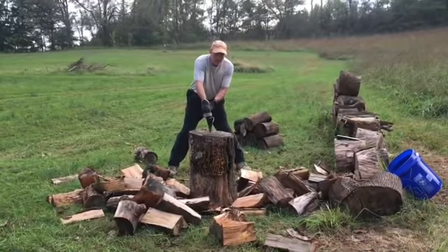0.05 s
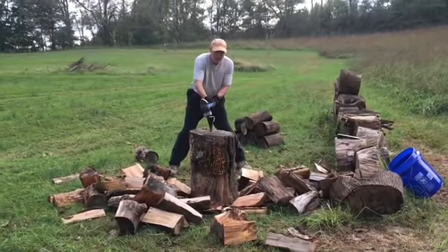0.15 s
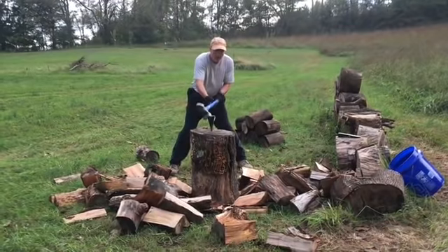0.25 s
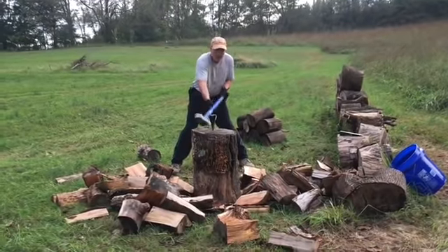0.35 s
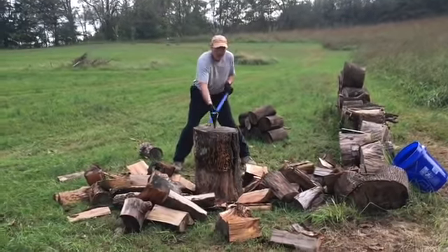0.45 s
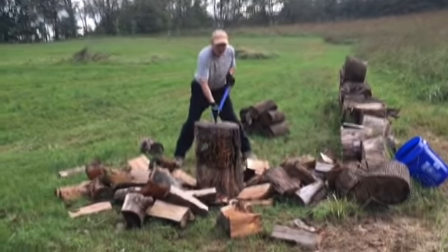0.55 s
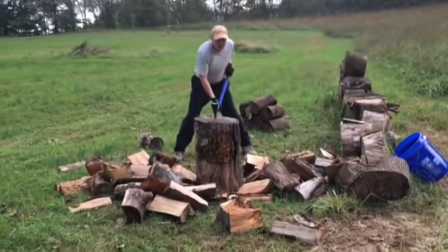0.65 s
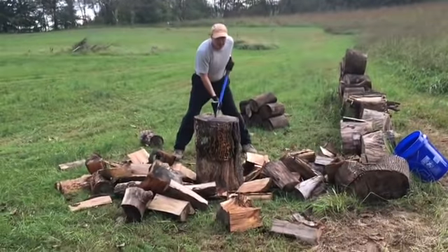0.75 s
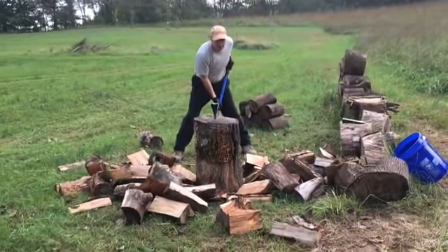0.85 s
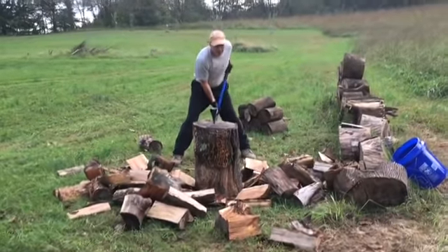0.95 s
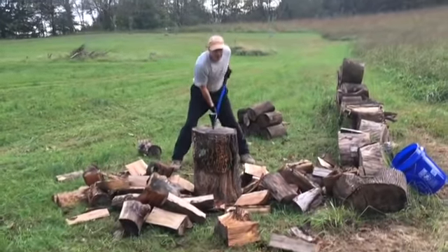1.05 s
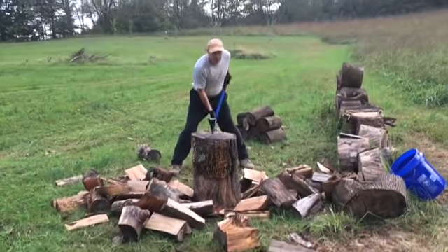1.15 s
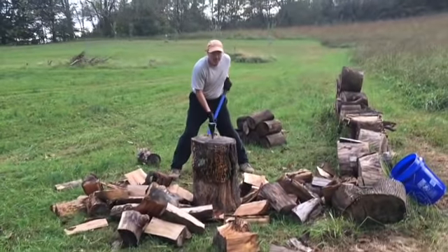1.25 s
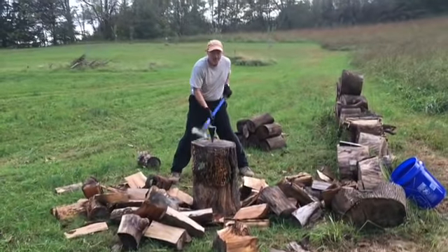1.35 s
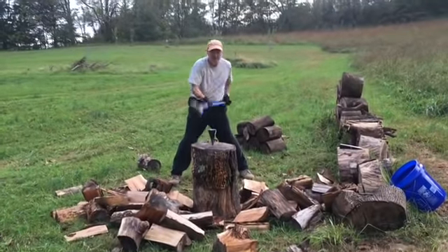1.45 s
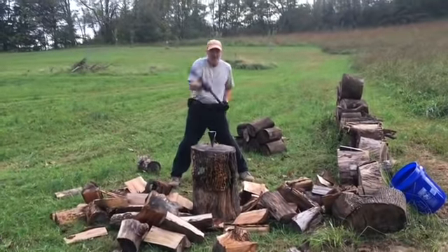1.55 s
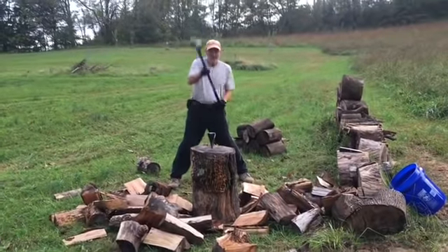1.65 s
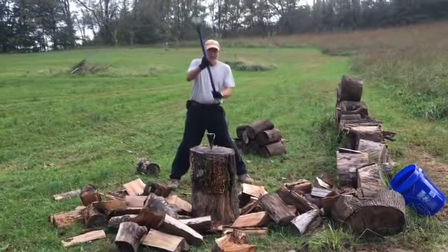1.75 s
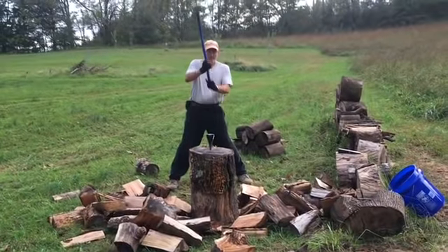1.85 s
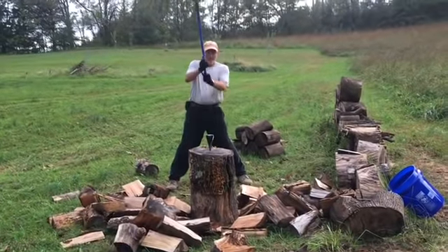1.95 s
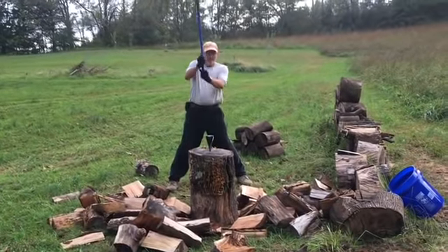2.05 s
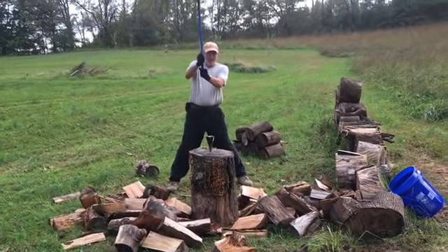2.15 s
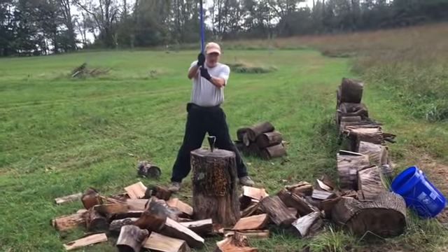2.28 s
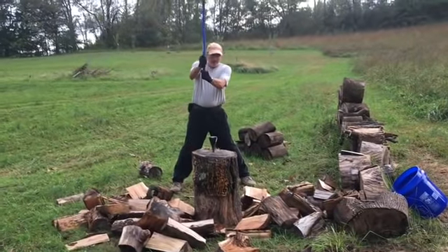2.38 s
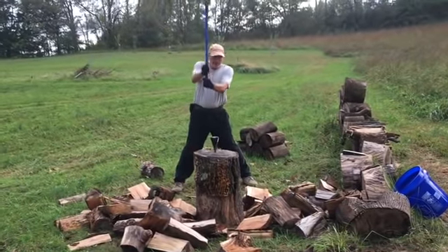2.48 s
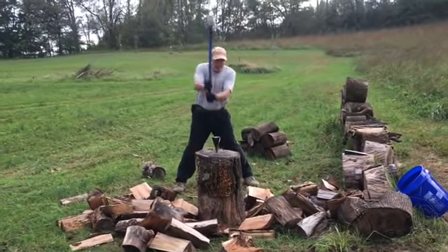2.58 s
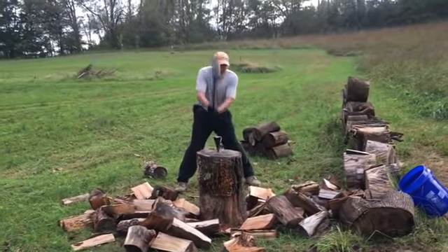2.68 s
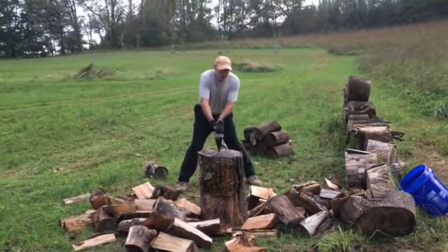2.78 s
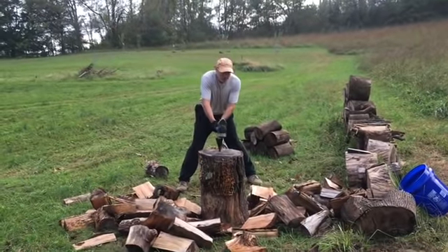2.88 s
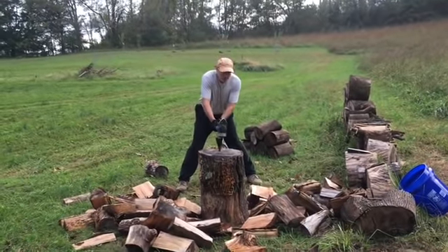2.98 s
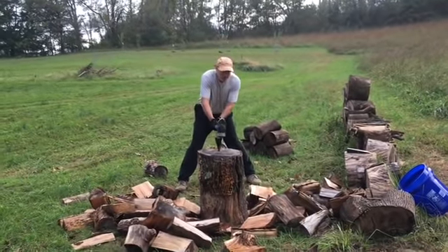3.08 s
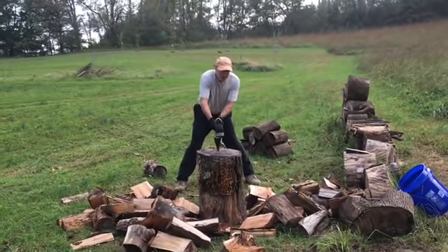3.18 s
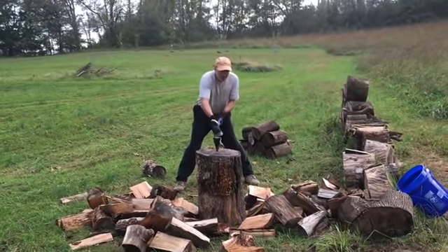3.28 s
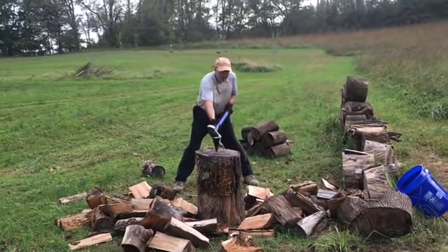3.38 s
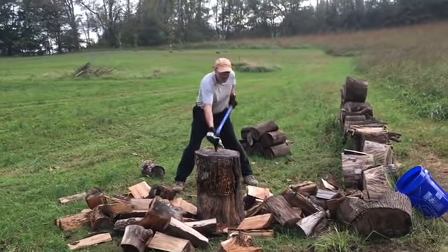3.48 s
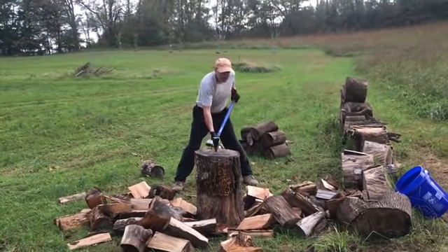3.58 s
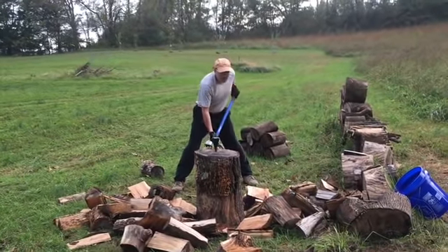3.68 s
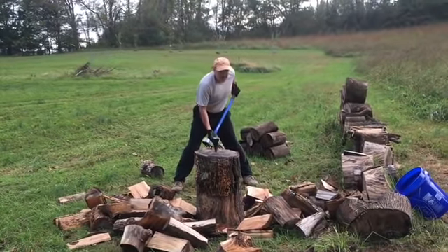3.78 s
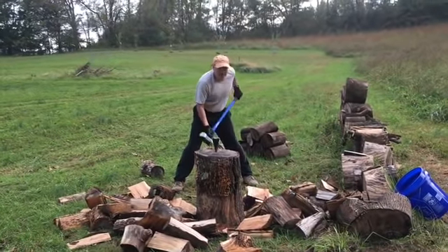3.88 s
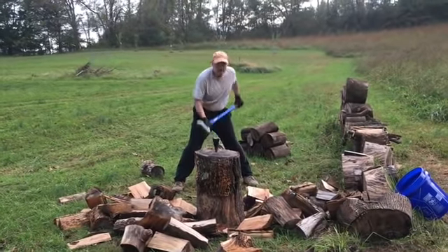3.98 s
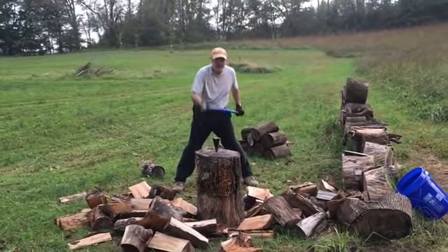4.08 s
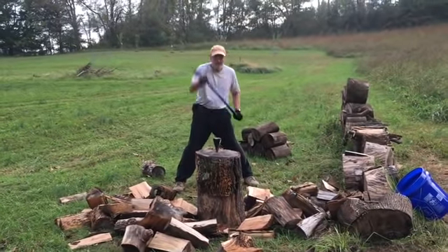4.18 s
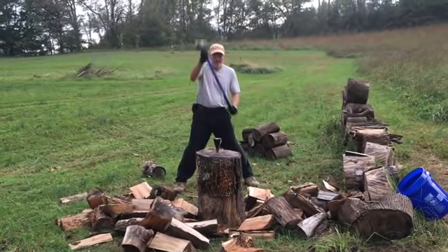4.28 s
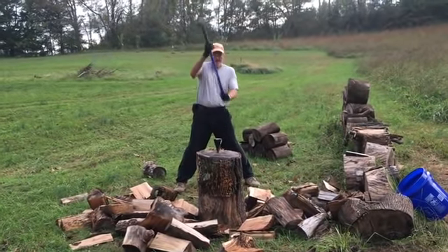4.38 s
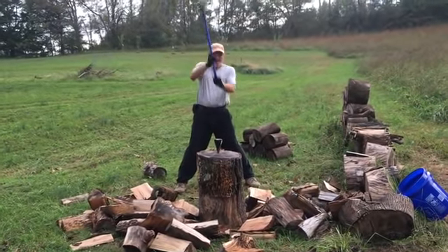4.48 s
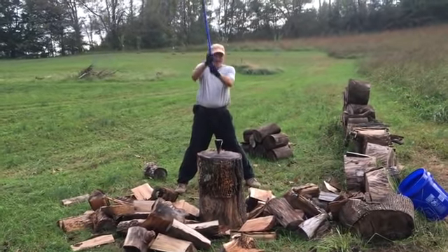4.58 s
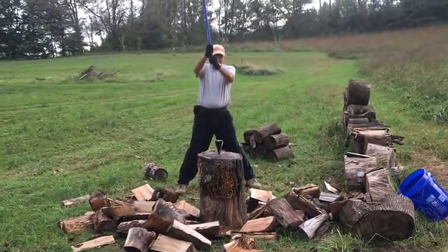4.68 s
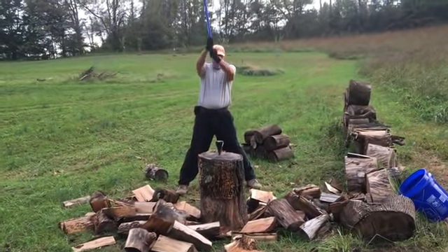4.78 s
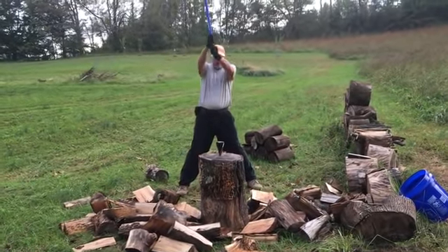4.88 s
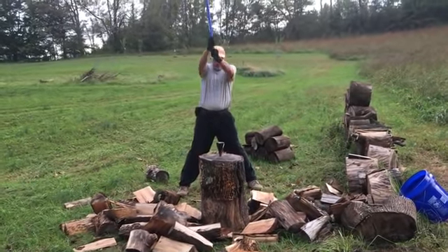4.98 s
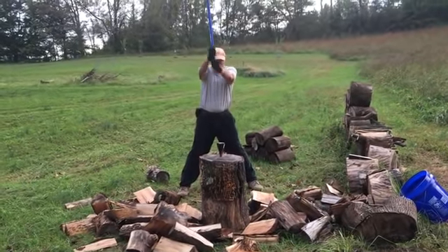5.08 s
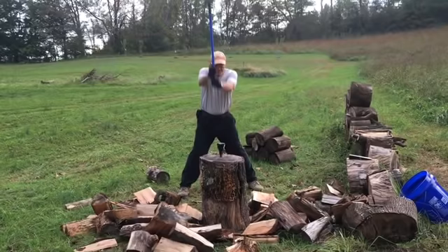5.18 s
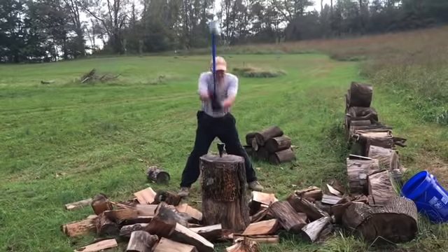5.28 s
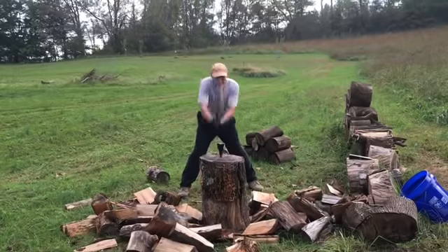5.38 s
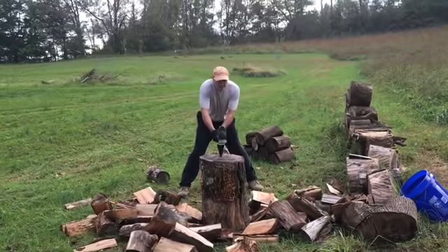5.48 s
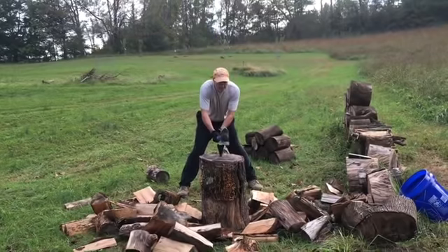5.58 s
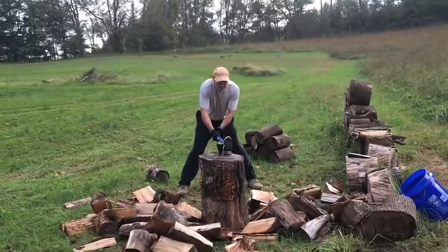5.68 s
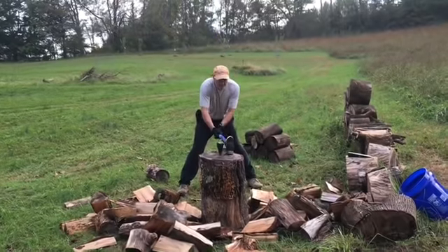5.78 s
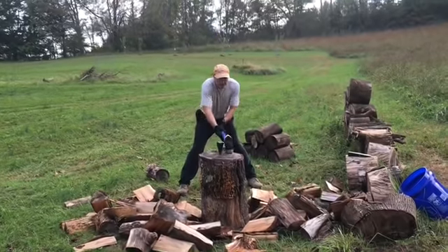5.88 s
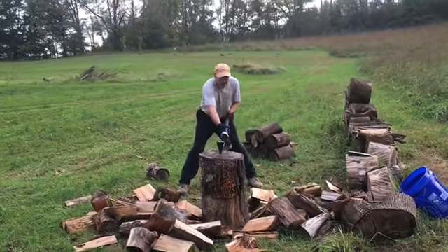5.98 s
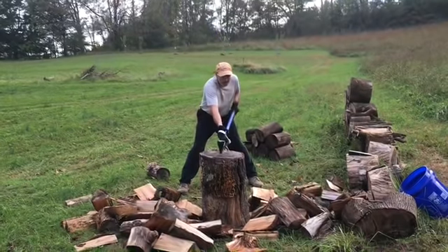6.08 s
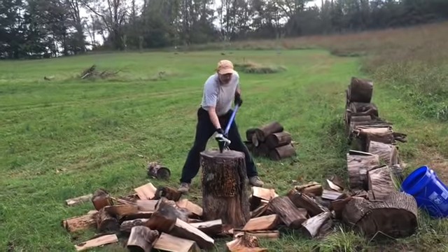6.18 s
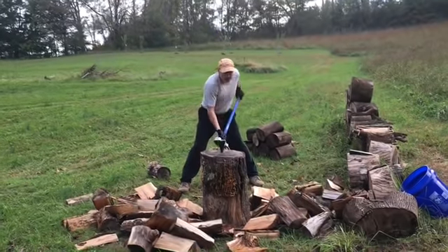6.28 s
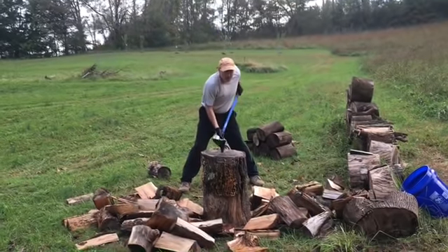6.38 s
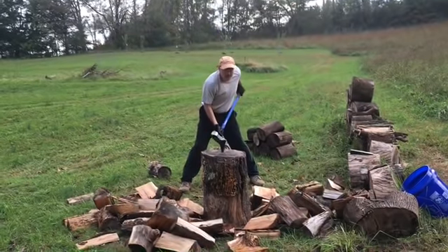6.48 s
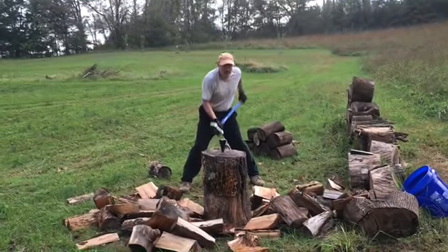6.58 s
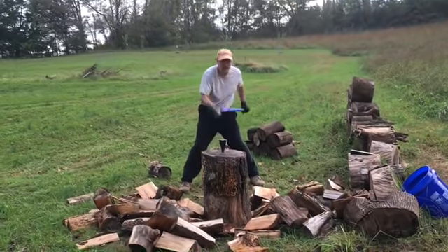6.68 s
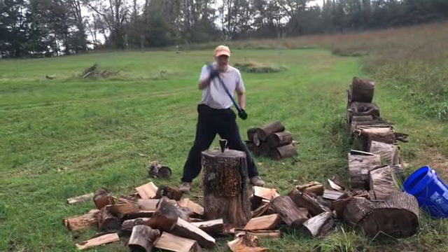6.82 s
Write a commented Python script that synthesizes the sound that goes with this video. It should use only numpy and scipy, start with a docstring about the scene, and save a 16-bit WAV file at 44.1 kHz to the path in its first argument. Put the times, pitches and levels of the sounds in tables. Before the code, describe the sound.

The echo of a hammer blow fades over an open meadow, with a soft wooden knock at about 0.3 seconds. Faint crickets trill throughout over a low distant rumble, and a katydid gives a short dry buzz every second or so. A small bird chirps quietly between 1.5 and 2.8 seconds. At 2.8 seconds a sledgehammer hits a steel wedge in a log close by: a sharp, bright, brief clang with a woody boom that overloads the microphone. The log rocks with a dull knock, and the echo rolls back from far trees for over a second. A second loud blow lands at 5.5 seconds, with a heavier boom and the same long echo. At 5.7 seconds the hammer head drops onto the wood with a hard clack. A few very soft bumps follow around 6.4 seconds, and the insects continue until the end, near 7 seconds.

```python
"""The echo of a sledgehammer blow dies away over a meadow. Close to the microphone the hammer falls twice
more on a steel wedge in an upright log: the steel clangs, the wood booms, the microphone overloads, and
the sound rolls back from the woodpiles and the far tree line. The log rocks after each blow, and twice
the hammer head drops onto the wood. Crickets trill with their wings near and far, a katydid buzzes now
and then, and a small bird twitters over the low rumble of the distance."""
import sys
import numpy as np
from scipy import signal
from scipy.fft import rfft, irfft
from scipy.io import wavfile

SR = 44100
rng = np.random.default_rng(int(sys.argv[2]) if len(sys.argv) > 2 else 0)


def generate_wav(signal):
    """Clip the signal to [-1, 1] and save it as 16-bit WAV at the path in sys.argv[1]."""
    frames = np.transpose(np.atleast_2d(signal))
    scaled = np.clip(frames, -1, 1) * 32767
    pcm = np.round(scaled).astype(np.int16)
    wavfile.write(sys.argv[1], SR, pcm)


N = 302085
T = np.arange(N) / SR
SHORT, LONG = T[:SR // 3], T[:2 * SR]

# Hammer blows, close up; of the first only the echo is heard. Each row: start in seconds, steel gain in
# dB, log gain in dB, log tilt in dB per octave, wedge travel in seconds, off-centre from 0 to 1,
# ground thump in dB, echo gain in dB.
BLOWS = [(-.4, -5, 13, 9, 0.0058, .02, -20, -3), (2.829, -6.5, 14, 9, 0.011, 0, -14.5, 4),
         (5.489, -5, 21.5, 6, 0.021, 1, -15, 5)]
# Modes of hammer and wedge. Each row: Hz, t60 in seconds, dB struck square, dB struck off-centre.
STEEL_MODES = [(1000, .016, 5, 4), (1450, .018, 5, -1), (1650, .016, -3, 9), (1850, .016, 4, 2),
               (2300, .016, -2, 3), (3270, .02, 9, 12), (3730, .018, 8, 3), (4030, .022, 9, 9),
               (4560, .022, 8, 7), (5090, .022, 6, 0), (5610, .022, 0, 4), (6430, .022, 3, -2),
               (6660, .025, -3, 2), (8750, .035, -3, 1), (9850, .025, -9, -7), (6945, .035, 13, 4),
               (7170, .03, 8, 9), (10690, .05, 2, 0), (13740, .09, -6, -22)]
# Modes of the log. Each row: Hz at pitch factor 1, dB before the tilt, t60 in seconds.
LOG_MODES = [(308, -7, 0.057), (376, -15.5, 0.083), (691, -15.5, 0.048), (862.3, 0, 0.031),
             (1080, -20, .022), (1520, -11.5, .022)]
# The crack of steel on steel. Each row: frequency in Hz, relative density in dB.
CRACK_SPECTRUM = [(100, -8.5), (500, -8.5), (900, 6.5), (1250, -5.5), (1700, 1.5), (2600, -5.5),
                  (4500, -7.5), (7000, -2.5), (10000, -14.5), (12000, -16), (16000, -24)]
# The hammer head drops onto the log. Each row: start in seconds, gain in dB, log pitch factor,
# log tilt in dB per octave, contact cut-off in Hz.
HEAD_DROPS = [(0.2534, -15, 0.99, 6, 1260), (5.7304, 5.5, 0.838, -1.1, 967)]
# Soft bumps as the hammer is shifted on the log. Each row: start in seconds, gain in dB.
SOFT_BUMPS = [(0.162, -30.5), (3.748, -36), (3.896, -36.5), (6.306, -35), (6.386, -34.5), (6.512, -31.5)]
# Single echoes off woodpiles and trees. Each row: delay in seconds, gain in dB.
ECHOES = [(.066, -29.5), (0.113, -27), (.153, -40), (.207, -36), (0.257, -36)]
# The long answer of the far tree line. Each row: frequency in Hz, gain in dB.
TREE_LINE_DB = [(100, -81.5), (300, -70.5), (550, -67.5), (815, -79), (1300, -70), (3000, -69), (5000, -70),
                (7000, -63), (10500, -58), (12000, -69), (15000, -74.5)]
# How long the tree line rings. Each row: frequency in Hz, t60 in seconds.
TREE_LINE_T60 = [(100, 0.5), (800, 3.5), (2000, 2.2), (4000, 1.96), (7000, 1.5), (10000, .8), (15000, .8)]
# Cricket choruses far out in the grass. Each row: centre in Hz, width in Hz, pulses per second,
# pulse depth from 0 to 1, level in dB at the start, level in dB at the end.
FAR_CHORUSES = [(4548, 720, 88, 1, -72, -69), (4391, 420, 77, 0.6, -65, -65.5),
                (5780, 510, 48, .7, -73.5, -66), (6390, 600, 24, 0.2, -66, -72.5),
                (6880, 540, 38, .6, -72.5, -74)]
# Two crickets nearer the microphone. Each row: pitch in Hz, level in dB at time zero,
# fading in dB per second, trill length in seconds, trill starts in seconds.
NEAR_CRICKETS = [(4090, -62.5, 1, .3, (.558, 1.735, 3.85, 6.33)),
                 (4560, -61.5, .2, .36, (.79, 1.69, 2.5, 4.62, 6.48))]
# The katydid's phrases. Each row: start in seconds, end in seconds, level in dB.
KATYDID_BUZZES = [(0.23, 0.468, -52), (1.665, 1.997, -55), (3.24, 3.544, -48.5), (4.257, 4.641, -51),
                  (5.89, 6.204, -50)]
# The colour of its buzz. Each row: frequency in Hz, relative density in dB.
KATYDID_SPECTRUM = [(1500, -6.5), (3200, 3), (4500, 3.5), (6000, 2.5), (9000, 3.5), (10500, -1),
                    (12000, 0.5), (16000, -2.5)]
# The bird's two-note calls. Each row: start in seconds, starting pitch in Hz, glide of each note in
# octaves, level of the second note in dB.
BIRD_CALLS = [(1.51, 3550, -0.11, -59), (2.165, 2470, .2, -55.5), (2.345, 3170, -0.18, -60),
              (2.589, 2580, .2, -52.5), (2.763, 3090, -.12, -53), (5.356, 3760, -0.082, -57.5)]
# Thin falling slurs from farther off. Each row: start in seconds, length in seconds, gain in dB.
BIRD_SLURS = [(2.735, 0.052, -51), (5.083, .11, -58)]
# Still air and distant rumble. Each row: frequency in Hz, relative density in dB.
AIR_SPECTRUM = [(15, -49.5), (25, -27.5), (35, -15), (52, 0), (80, -0.5), (110, -3.5), (160, -15),
                (250, -20), (500, -30.5), (1200, -34.5), (3000, -38), (8000, -41.5), (10400, -45),
                (12000, -41), (16000, -39)]


def hammering(response, ground_hz=78, ground_t60=.12):
    """Close up, steel meets steel, the log booms as the wedge slides in, and the ground thumps."""
    out = np.zeros(N)
    thump = np.sin(2 * np.pi * ground_hz * SHORT) * dying(SHORT, ground_t60)
    # the contact is so brief that the trees return it as an even wash under the ring
    snap = from_db(40) * filtered(signal.unit_impulse(len(SHORT)), 4500, "low")
    for s, steel_db, log_db, tilt_db, travel_s, off_centre, thump_db, echo_db in BLOWS:
        ring = steel_ring(off_centre)
        # the push on the wood swells, then stops as the wedge sticks
        push = (SHORT / travel_s) ** 2 * np.exp(1 - (SHORT / travel_s) ** 2)
        boom = push * from_db(log_db) * log_ring(pitch=.95, tilt_db=tilt_db, cut_hz=2000)
        body = boom + from_db(thump_db) * thump
        add(out, s, from_db(steel_db) * clang(ring) + body)
        outgoing = from_db(steel_db) * (ring + snap) + body
        add(out, s, from_db(echo_db) * signal.fftconvolve(outgoing, response))
    return out


def steel_ring(off_centre):
    """The steel's modes, quickly damped by the wood that grips the wedge."""
    return sum(from_db(square_db + off_centre * (edge_db - square_db)) * mode(hz, t60)
               for hz, t60, square_db, edge_db in STEEL_MODES)


def clang(ring, crack_db=17, crack_t60=.018, firewood_db=-15):
    """Ring and contact crack, smeared by the firewood lying around."""
    out = ring + from_db(crack_db) * noise(CRACK_SPECTRUM, len(SHORT)) * dying(SHORT, crack_t60)
    firewood = filtered(scatter(t60=.1), 9000, "low")
    add(out, .004, from_db(firewood_db) * signal.fftconvolve(out, firewood))
    return out


def log_ring(pitch, tilt_db, cut_hz):
    """The log's modes, tilted by tilt_db per octave; a soft contact leaves only the lowest."""
    pivot_hz = LOG_MODES[3][0]
    ring = sum(from_db(db + tilt_db * np.log2(hz / pivot_hz)) * mode(hz * pitch, t60)
               for hz, db, t60 in LOG_MODES)
    return filtered(ring, cut_hz, "low", order=6)


def log_knocks(response, rock_delay_s=.074, rock_db=2, settle_s=.021, settle_db=-8.5, echo_db=-10):
    """Dull knocks and their echoes: the log rocks, the hammer head drops on it or is shifted."""
    rock = log_ring(pitch=.668, tilt_db=8, cut_hz=306)
    bump = log_ring(pitch=1.2, tilt_db=-.5, cut_hz=370)
    knocks = []
    for s, *_ in BLOWS:
        # the log drops back on the ground, then settles with a weaker second bump
        landing = s + rock_delay_s
        knocks += [(landing, rock_db, rock), (landing + settle_s, settle_db, rock)]
    knocks += [(s, db, log_ring(*contact)) for s, db, *contact in HEAD_DROPS]
    knocks += [(s, db, bump) for s, db in SOFT_BUMPS]
    out = np.zeros(N)
    for s, db, ring in knocks:
        add(out, s, from_db(db) * ring)
        add(out, s, from_db(db + echo_db) * signal.fftconvolve(ring, response))
    return out


def head_clacks(base_db=-25, hardness=2.25, t60=.051):
    """The dropped head clacks on the wood; the clack grows faster than the knock as drops get harder."""
    out = np.zeros(N)
    for s, db, *_ in HEAD_DROPS:
        clack = rms_one(filtered(rng.standard_normal(len(SHORT)), [1200, 2300], "band", order=3))
        add(out, s, from_db(base_db + hardness * db) * clack * dying(SHORT, t60))
    return out


def meadow_response(build_s=.06, echo_rise_s=.0066):
    """What returns to the microphone: a few scattered echoes and the long wash of the far trees."""
    response = np.zeros(len(LONG))
    edges = np.geomspace(70, 17000, 25)
    for low, high in zip(edges, edges[1:]):
        hz = np.sqrt(low * high)
        band = filtered(rng.standard_normal(len(LONG)), [low, high], "band")
        response += band * from_db(at_hz(TREE_LINE_DB, hz)) * dying(LONG, at_hz(TREE_LINE_T60, hz))
    response *= 1 - np.exp(-LONG / build_s)
    for delay, db in ECHOES:
        echo = scatter(t60=.038) * (1 - np.exp(-SHORT / echo_rise_s))
        add(response, delay, from_db(db) * filtered(echo, [700, 5000], "band"))
    return response


def near_crickets(pulses_per_s=39, depth=.65, fade_s=.016, spread_hz=18, wander_hz=40):
    """Two nearer crickets repeat a pulsed, wavering trill, each on its own pitch."""
    out = np.zeros(N)
    for hz, db, fading_db, length, starts in NEAR_CRICKETS:
        t = T[:int(length * SR)]
        pulses = 1 - depth * np.cos(2 * np.pi * pulses_per_s * t)
        fade = np.clip(np.minimum(t, t[-1] - t) / fade_s, 0, 1)
        for start in starts:
            wander = wander_hz * flutter(100, SR)[:len(t)]
            pitch = hz + spread_hz * rng.standard_normal() + wander
            add(out, start, from_db(db - fading_db * start) * rms_one(pulses * fade * tone(pitch)))
    return out


def katydid(swell_s=.12, stop_s=.052, rasp_db=1.6):
    """Each dry, broad buzz swells and then breaks off; uneven wing strokes make it rasp."""
    level = sum(from_db(db) * np.clip(np.minimum((T - start) / swell_s, (end - T) / stop_s), 0, 1)
                for start, end, db in KATYDID_BUZZES)
    rasp = from_db(rasp_db * flutter(60, N))
    return level * rasp * noise(KATYDID_SPECTRUM, N)


def bird(note_s=.031, note_every_s=.06, step_glides=1.9, louder_db_per_octave=9.5):
    """Two-note calls that step the way they glide, and high slurs farther off, blurred by the trees."""
    calls, slurs = np.zeros(N), np.zeros(N)
    for s, hz, octaves, db in BIRD_CALLS:
        step = step_glides * octaves
        for k in range(2):
            note = whistle(hz * 2 ** (k * step), octaves, note_s)
            add(calls, s + k * note_every_s, from_db(db + louder_db_per_octave * step * (k - 1)) * note)
    for s, length, db in BIRD_SLURS:
        add(slurs, s, from_db(db) * whistle(hz=9800, octaves=-.43, length_s=length))
    call_blur = from_db(-5) * signal.fftconvolve(calls, scatter(t60=.48))[:N]
    slur_blur = from_db(-1) * signal.fftconvolve(slurs, scatter(t60=.5))[:N]
    return calls + call_blur + from_db(-6) * slurs + slur_blur


def whistle(hz, octaves, length_s, quaver_octaves=.031):
    """One gliding bird note with a slight quaver."""
    along = np.linspace(0, 1, int(length_s * SR))
    quaver = quaver_octaves * flutter(180, SR)[:len(along)]
    return np.sin(np.pi * along) * tone(hz * 2 ** (octaves * along + quaver))


def far_crickets():
    """Choruses all round the meadow, each a narrow resonance that throbs with the wing strokes."""
    out = np.zeros(N)
    for hz, width_hz, rate, depth, first_db, last_db in FAR_CHORUSES:
        band = filtered(rng.standard_normal(N), [hz - width_hz / 2, hz + width_hz / 2], "band", order=5)
        strokes = 1 + depth * np.sin(2 * np.pi * (rate * T + rng.random()))
        out += from_db(np.linspace(first_db, last_db, N)) * rms_one(band * strokes)
    return out


def still_air(db=-47):
    """Faint hiss and distant rumble behind everything."""
    return from_db(db) * noise(AIR_SPECTRUM, N)


def from_db(db):
    """Decibels to gain."""
    return 10 ** (np.asarray(db) / 20)


def rms_one(x):
    """Scale to an rms of 1."""
    return x / np.sqrt(np.mean(x ** 2) + 1e-20)


def at_hz(points, hz):
    """Read a table along log frequency."""
    f, value = np.transpose(points)
    return np.interp(np.log(hz + 1), np.log(f), value)


def dying(t, t60):
    """Envelope that loses 60 dB in t60 seconds."""
    return np.exp(-np.log(1000) * t / t60)


def mode(hz, t60):
    """One struck resonance."""
    return np.cos(2 * np.pi * hz * SHORT) * dying(SHORT, t60)


def tone(hz):
    """A sine that follows a pitch curve."""
    return np.sin(2 * np.pi * np.cumsum(hz) / SR)


def add(track, s, sound):
    """Mix a sound in from s seconds; what falls outside the track is cut."""
    at = round(s * SR)
    sound, at = sound[max(-at, 0):], max(at, 0)
    track[at:at + len(sound)] += sound[:len(track) - at]


def filtered(x, hz, kind, order=2):
    """Butterworth filter."""
    return signal.sosfilt(signal.butter(order, hz, kind, fs=SR, output="sos"), x)


def flutter(hz, size):
    """Random wavering below hz, rms 1."""
    return rms_one(filtered(rng.standard_normal(size), hz, "low"))


def noise(spectrum, size):
    """Coloured noise of rms 1."""
    gain = from_db(at_hz(spectrum, np.fft.rfftfreq(size, 1 / SR)))
    return rms_one(irfft(rfft(rng.standard_normal(size)) * gain, size))


def scatter(t60):
    """A dying spray of small reflections with an energy of 1."""
    spray = rng.standard_normal(len(SHORT)) * dying(SHORT, t60)
    return spray / np.linalg.norm(spray)


def scene():
    """One microphone: the work in front, the meadow behind."""
    response = meadow_response()
    work = hammering(response) + log_knocks(response) + head_clacks()
    meadow = far_crickets() + near_crickets() + katydid() + bird() + still_air()
    return (work + meadow)[None]


def record(dry, ceiling=.99, soften_hz=13500, cutoff_hz=15800):
    """The microphone overloads on the blows; the treble is softened, then cut."""
    clipped = ceiling * dry / (1 + (dry / ceiling) ** 8) ** (1 / 8)
    softened = filtered(clipped, soften_hz, "low", order=1)
    return signal.sosfilt(signal.ellip(10, .1, 80, cutoff_hz, fs=SR, output="sos"), softened)


dry = scene()
out = record(dry)
generate_wav(out)
```